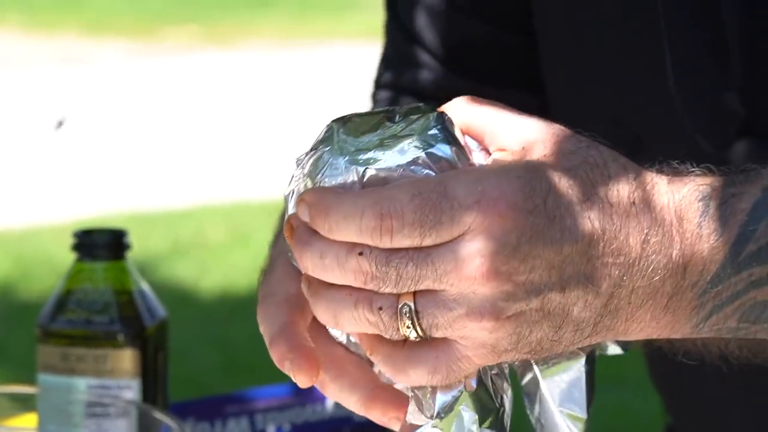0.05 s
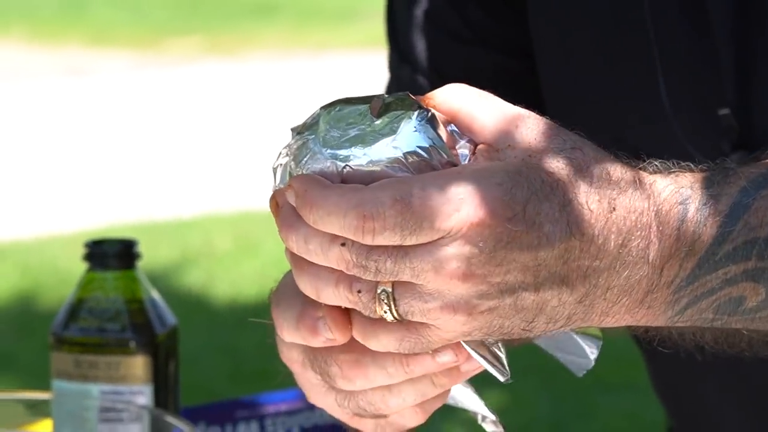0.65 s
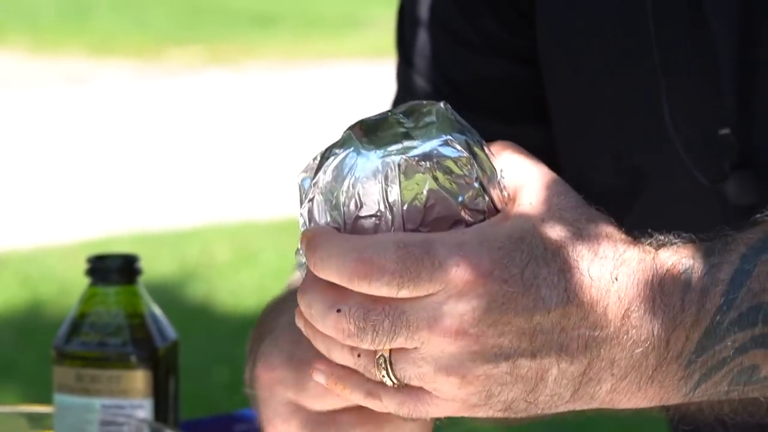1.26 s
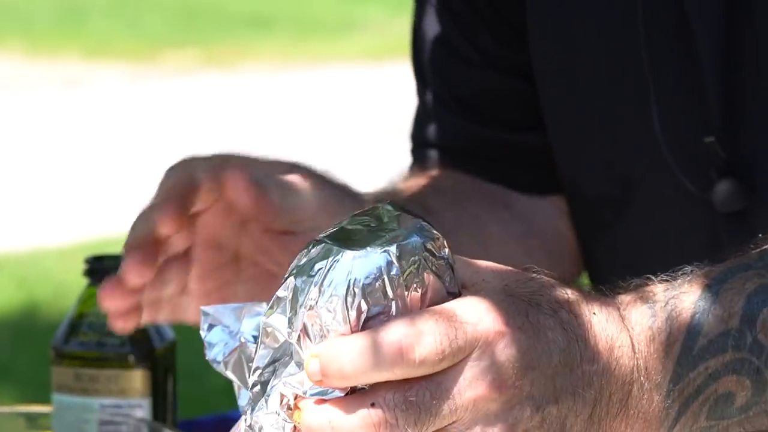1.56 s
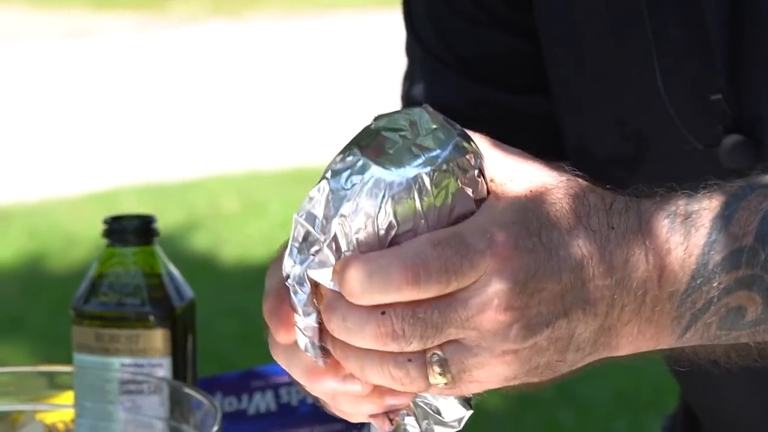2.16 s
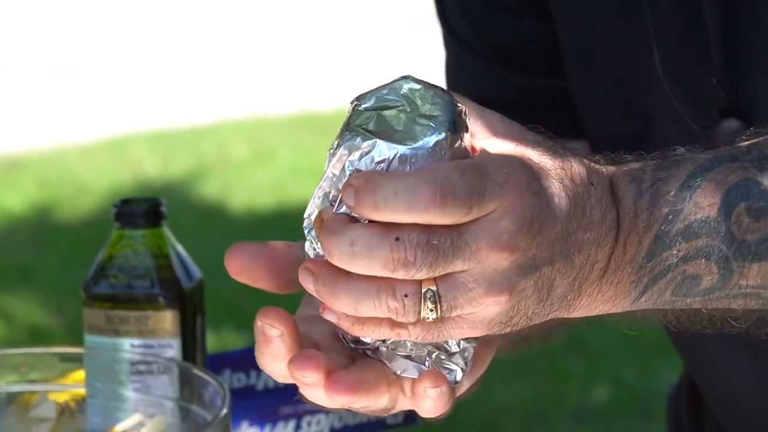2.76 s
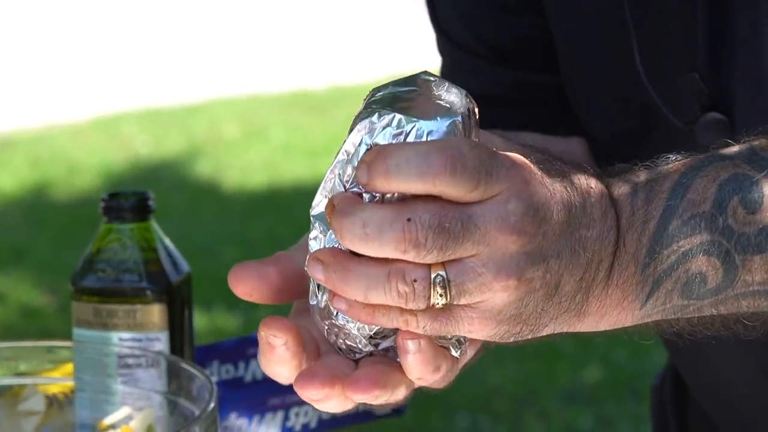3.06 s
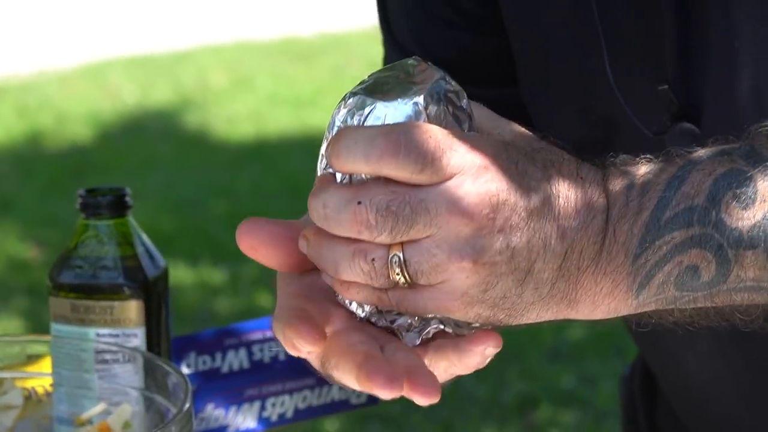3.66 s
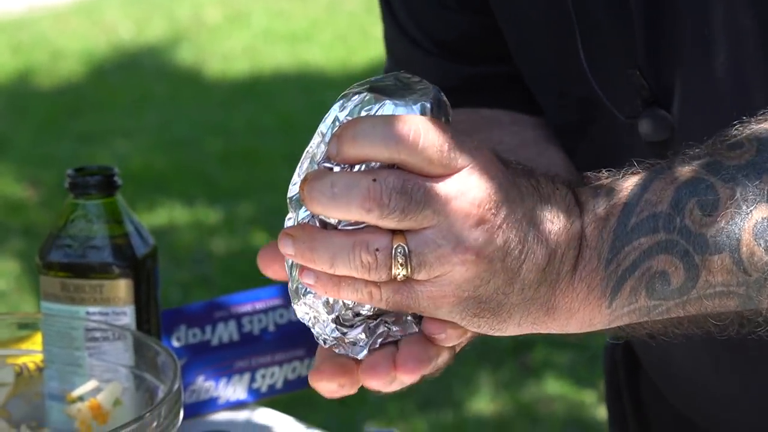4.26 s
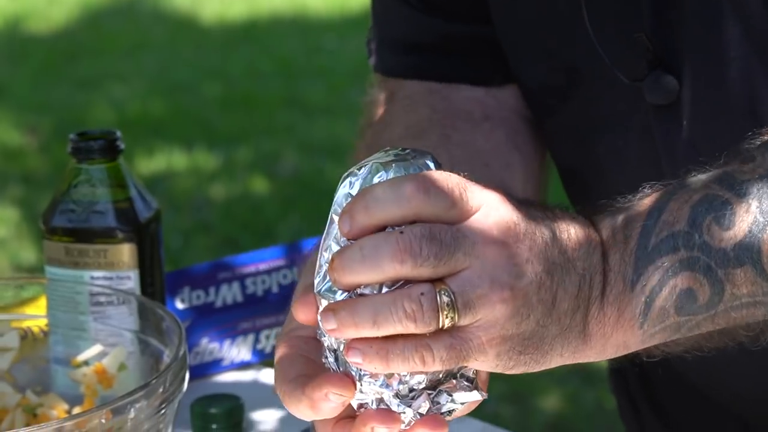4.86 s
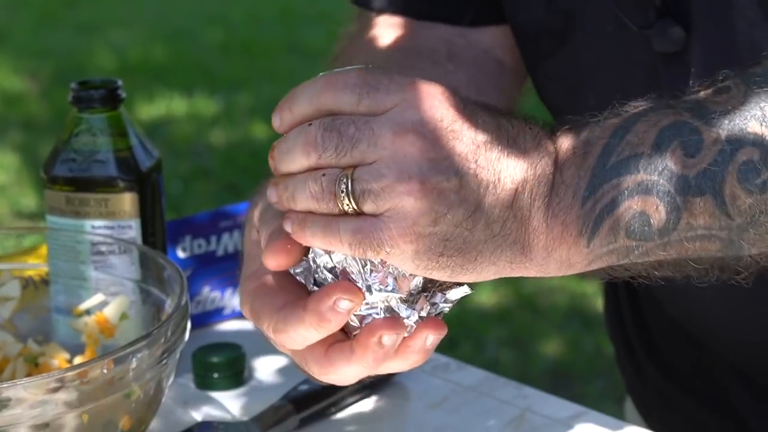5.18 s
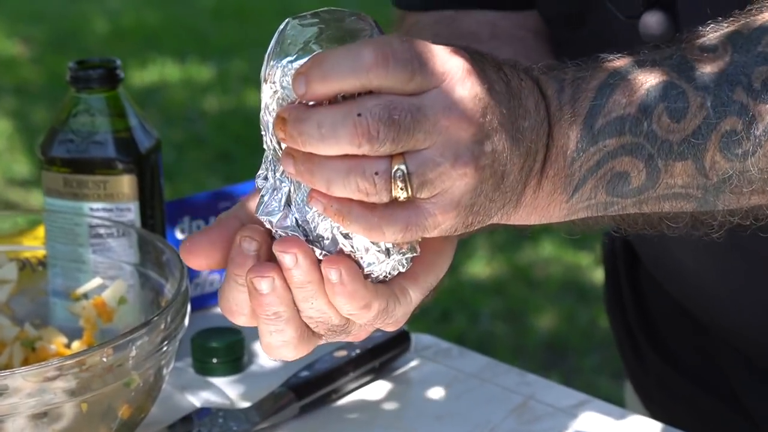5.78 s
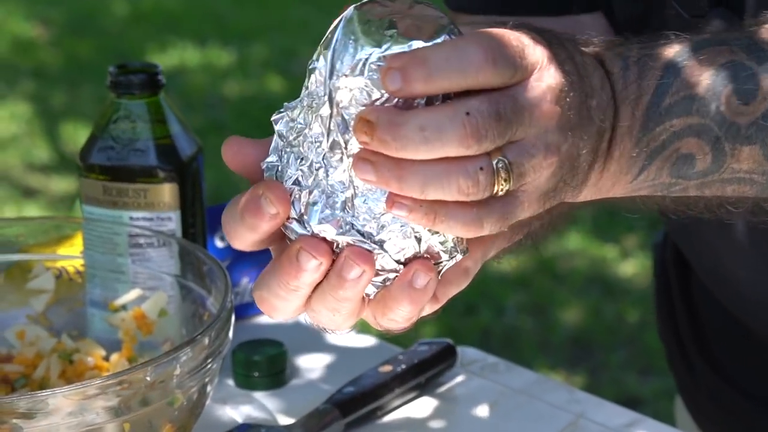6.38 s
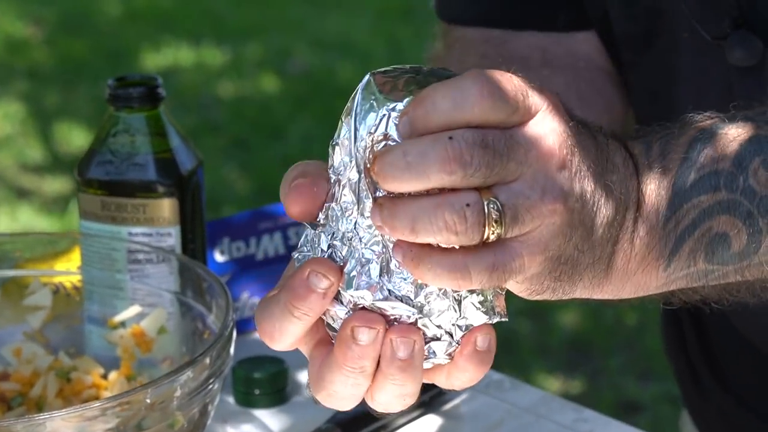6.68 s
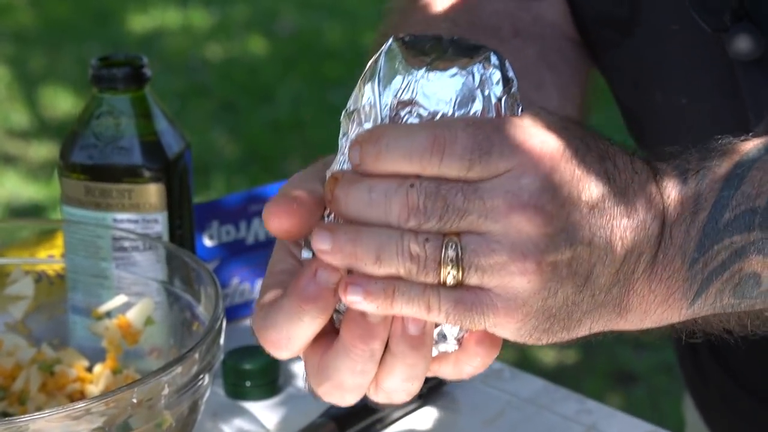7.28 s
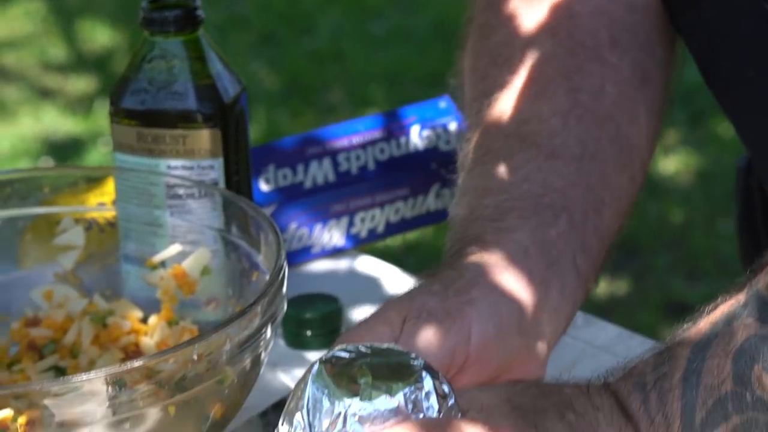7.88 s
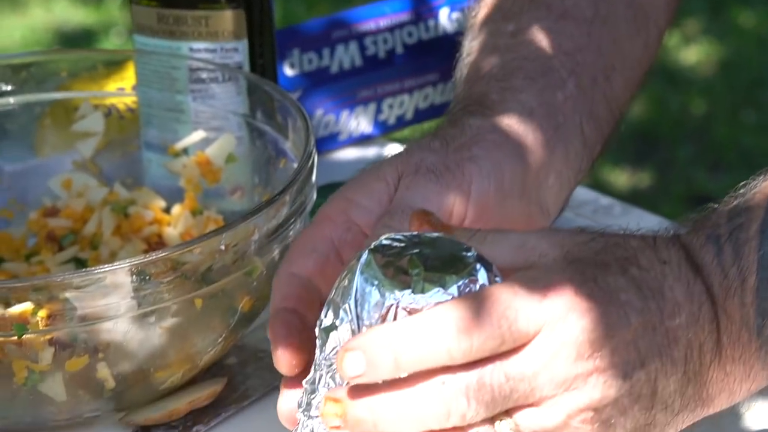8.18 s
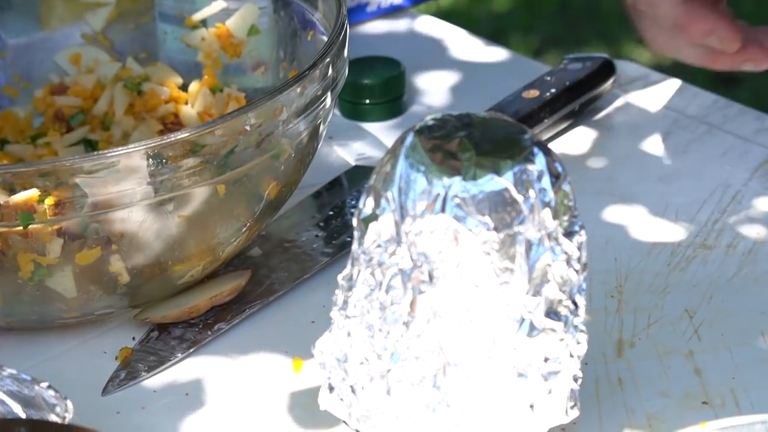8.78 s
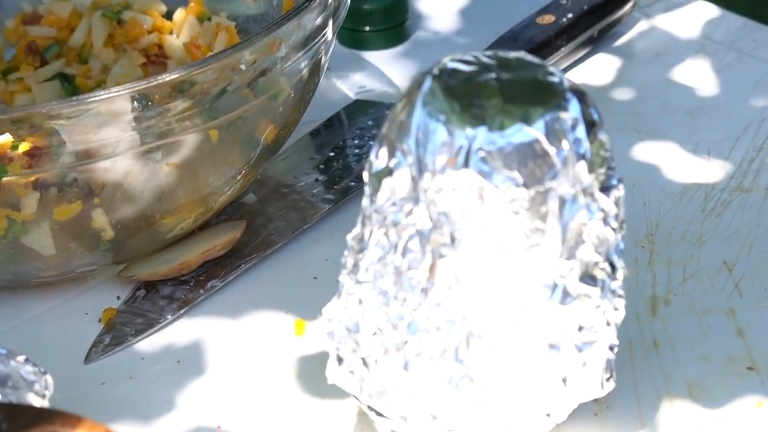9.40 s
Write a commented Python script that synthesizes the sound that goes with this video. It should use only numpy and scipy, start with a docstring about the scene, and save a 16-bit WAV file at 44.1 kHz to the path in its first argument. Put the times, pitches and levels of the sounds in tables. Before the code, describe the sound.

Two hands press aluminium foil around food close to the microphone. For about three seconds it crinkles densely, with sharp little snaps and a few dull pats. As the wrap tightens, it drops to softer, scattered rustles and ticks. Near the end the bundle is set on a table with a crunchy knock. A faint low garden rumble runs underneath, and one far bird chirps at the close.

```python
"""Aluminium foil crinkles close by as two hands press it around food, then set it on a table with a knock.
The loose sheet crumples in dense swarms of tiny buckles, larger facets snap and ring, palms pat the
bundle, and the tightened wrap only rustles. Behind it lies a garden: a low rumble, a light breeze
and, near the end, one far bird."""
import sys
import numpy as np
from scipy import signal
from scipy.fft import rfft, irfft, next_fast_len
from scipy.io import wavfile

SR = 44100
rng = np.random.default_rng(int(sys.argv[2]) if len(sys.argv) > 2 else 0)


def file_out(sig):
    """Save sig as 16-bit WAV at sys.argv[1]."""
    # one column per channel
    cols = np.atleast_2d(sig).T
    # limit, then scale
    lim = np.clip(cols, -1, 1)
    pcm = np.round(lim * 32767).astype(np.int16)
    wavfile.write(sys.argv[1], SR, pcm)


N = 420713
TIME = np.arange(N) / SR


def crinkle(body_gain, treble_gain, tighten_start_s=2.2, tighten_length_s=1, split_hz=4500):
    """Harder squeezes buckle more creases a second; the wrap loses its low body as it tightens."""
    # Hand contact. Each row: time in seconds, share of sliding 0-1, top-octave sheen in dB.
    touch = [(0, 0.32, -1.5), (.9, 0.08, -1.5), (1.4, 0.65, -3), (1.55, 0.67, 2), (2.0, 0.25, .5),
             (3.0, 0, -2.5), (3.6, 0.27, -0.5), (4.7, 0.07, -0.5), (5.45, 0.01, 2), (5.95, 0.38, -2),
             (6.35, 0.8, -2), (6.7, 0.04, -1), (7.05, 0.35, 1.5), (7.55, 0.65, 1), (8.1, 0, 2),
             (8.75, .02, 4)]
    # Spectra of loose sheet and tight wrap. Each row: frequency in Hz, gain in dB.
    loose_spectrum = [(170, -1.5), (500, -1), (800, -2.5), (1200, 1.5), (1750, 4), (2250, -2.5),
                      (2750, 2.5), (3800, -8), (5500, -3), (7500, -3), (10000, -7), (13000, -2.5),
                      (16000, -4.5)]
    tight_spectrum = [(200, -9), (600, 2), (1050, -3.5), (1500, 6), (1900, 6), (2300, -2), (2900, 1.5),
                      (3800, -8), (5200, -2.5), (7500, -6), (9500, -7), (13000, -2.5), (16000, -9)]
    slide, sheen_db = curves(touch)
    slide = np.clip(slide, 0, 1)
    rate_per_s = 350 + 800 * np.sqrt(np.hypot(body_gain, treble_gain) / undb(-45))
    swarm = buckles(rate_per_s, spread_db=4.5, t60_s=0.013)
    swarm += undb(-7.5) * facets(low_hz=1753, high_hz=15100, cycles=41, spread_db=2.5, count=3600)
    lone_creases = buckles(130, spread_db=2.5, t60_s=0.0033)
    swarm = unit(swarm + undb(-3) * lone_creases)
    # sliding skin trips so many creases that they merge
    slide_hiss = buckles(13000, spread_db=-1.5, t60_s=0.0093)
    swarm = np.sqrt(1 - slide) * swarm + np.sqrt(slide) * slide_hiss
    swarm *= undb(wander(54))  # the foil gives way in fits
    swarm = cupped_palms(swarm, echo=0.18, lag_s=0.0005015, sway=0.3)
    tightness = np.clip((TIME - tighten_start_s) / tighten_length_s, 0, 1)
    foil = (1 - tightness) * colour(swarm, loose_spectrum) + tightness * colour(swarm, tight_spectrum)
    foil += (undb(sheen_db) - 1) * colour(foil, [(4000, -43), (7500, -6), (11000, 3.5)])
    body = unit(band(foil, split_hz, "lowpass", order=4))
    treble = unit(band(foil, split_hz, "highpass", order=4))
    return body_gain * body + treble_gain * treble


def buckles(rate_per_s, spread_db, t60_s):
    """A swarm of tiny buckles of random size, each a sudden noise burst that dies at once."""
    hits = rng.random(N) < rate_per_s / SR
    size = undb(spread_db * np.minimum(rng.exponential(size=N), 4))
    power = signal.lfilter([1], [1, -fade(2 / SR, t60_s)], hits * size ** 2 / rate_per_s + 1e-18)
    return unit(np.sqrt(power) * rng.standard_normal(N))


def facets(low_hz, high_hz, cycles, spread_db, count):
    """Small facets flip and ring briefly, each at its own pitch."""
    out, t = np.zeros(N), TIME[:512]
    for when, pitch, size in rng.random((count, 3)):
        hz = low_hz * (high_hz / low_hz) ** pitch
        gain = undb(-spread_db * np.log(size + 0.013)) * np.sqrt(hz)
        add(out, when * TIME[-1], gain * ring(t, hz, cycles / hz))
    return unit(out)


def pressure(attack_db_per_s=1200, release_db_per_s=707):
    """Body and treble gains of the crinkle: each squeeze takes hold, swells or eases, and lets go."""
    # Light hold between squeezes. Each row: time in seconds, level in dB, treble minus body in dB.
    grip = [(0, -52, 2), (1.4, -48.5, -3), (1.65, -72, 2), (1.76, -72, -8), (2.3, -44.5, -3), (2.5, -58, 6),
            (3.2, -64.5, 11), (8.0, -67.5, 7), (8.35, -79, -8), (8.75, -72.5, 14), (9.5, -82, 8)]
    # Finger squeezes. Each row: start and length in seconds, midpoint level in dB,
    # swell from start to end in dB, treble minus body in dB.
    squeezes = [(0.017, 0.042, -43.5, 5, -2), (0.084, 0.041, -40.5, -19, 2), (0.114, 0.088, -37.5, -1, -2),
                (0.281, 0.062, -36, 11, -3.5), (0.423, 0.044, -35, 7.5, 3), (0.5, 0.026, -33.5, 10, -5.5),
                (0.586, 0.038, -38, 3, -8.5), (0.663, 0.027, -43, 8, -4), (0.723, 0.076, -37.5, 7, -1.5),
                (0.816, 0.028, -38, 15.5, -1.5), (0.895, 0.027, -33, 6.5, 3), (0.994, 0.0093, -42, 13, 2),
                (1.059, 0.124, -41.5, -9.5, -2), (1.235, 0.032, -49, -11, 6),
                (1.297, 0.078, -41, -2.5, 3.5), (1.387, 0.029, -44, 18, 8), (1.461, 0.023, -31.5, 3, -2.5),
                (1.517, 0.038, -27.5, 5.5, 1), (1.766, 0.043, -34, -0.5, -2.5),
                (1.855, 0.071, -34.5, -1.5, -2.5), (1.947, 0.043, -35.5, -5, -3.5),
                (2.01, 0.1, -43, 5, -1.5), (2.143, 0.027, -42.5, 12, 2), (2.24, 0.15, -43.5, 5.5, 3),
                (2.508, 0.096, -39.5, 14.5, 0), (2.678, 0.14, -40.5, 13.5, 3.5),
                (2.882, 0.042, -40, 2.5, 6), (2.954, 0.073, -43.5, 17, 1.5), (3.082, 0.035, -53, -2, 1),
                (3.289, 0.058, -53, -10.5, 1.5), (3.39, 0.143, -58.5, 4, 4),
                (3.572, 0.059, -55.5, 19.5, -3), (3.719, 0.049, -63.5, 0, 10), (3.837, 0.068, -53.0, 7, 3),
                (4.051, 0.022, -52.5, 14, 1), (4.114, 0.051, -48.0, 12, 3), (4.24, 0.042, -59.5, -12, -1),
                (4.394, 0.12, -54, 13, 1), (4.538, 0.058, -45, -10, 0), (4.665, 0.049, -45.5, 4.5, 0.5),
                (4.748, 0.079, -57, -2, -1), (4.904, 0.075, -51, 3.5, 4.5), (5.114, 0.17, -56.5, -6, 3),
                (5.393, 0.062, -44, 17, 3), (5.627, 0.013, -49, -20, -2), (5.672, 0.046, -57.5, 8, 3),
                (5.82, 0.034, -48.5, 3.5, 7), (5.994, 0.08, -52, 4.5, 6), (6.137, 0.05, -57, 4, 6),
                (6.368, 0.13, -56, 6, 9), (6.541, 0.18, -56.5, -2.5, 3), (6.85, 0.055, -57, 3, 4),
                (6.94, 0.011, -53, 11, 17), (6.978, 0.017, -51, -2, -1), (7.022, 0.15, -59.5, 0, 8),
                (7.409, 0.021, -51.5, -3, -1), (7.468, 0.033, -50.5, 3.5, 5), (7.52, 0.14, -57.5, 2, 2),
                (7.62, 0.017, -57, 4, -15), (7.941, 0.077, -57.5, -4, 6)]
    layers = [curves(grip)]
    for start_s, length_s, db, swell_db, treble_db in squeezes:
        t = TIME - start_s
        edges_db = attack_db_per_s * np.maximum(-t, 0) + release_db_per_s * np.maximum(t - length_s, 0)
        ramp_db = swell_db * (np.clip(t / length_s, 0, 1) - .5)
        layers.append((db + ramp_db - edges_db, treble_db))
    total_power, treble_power = np.zeros(N), np.zeros(N)
    for db, treble_db in layers:
        active = db > -100
        power = undb(db[active]) ** 2
        total_power[active] += power
        treble_power[active] += power / (1 + undb(-treble_db) ** 2)
    return np.sqrt(total_power - treble_power), np.sqrt(treble_power)


def snaps():
    """A big facet pops through: a short ring, a hard-edged crack and a shiver of the sheet around it."""
    # Each row: start in seconds, ring pitch in Hz, relative ring and crack levels in dB,
    # crack centre in Hz.
    pops = [(0.0792, 2940, -31.5, -26.5, 5300), (0.0898, 3100, -33, -43, 4850),
            (0.1268, 3130, -32, -28, 6600), (0.155, 2060, -36, -28.5, 3100), (0.171, 1680, -33, -48, 2800),
            (0.199, 6470, -28, -29, 6300), (0.2838, 1370, -43, -30.5, 5700), (0.3314, 1850, -36, -32, 4300),
            (0.366, 6300, -45, -32, 5600), (0.459, 3060, -38, -32, 6200), (0.5165, 1590, -28.5, -37, 3700),
            (0.5659, 6070, -55, -42, 7300), (0.5987, 2480, -42, -35, 7900),
            (0.7271, 1420, -30, -26.5, 4260), (0.7337, 5430, -32, -36, 4100),
            (0.773, 2580, -25.5, -35, 2800), (0.8456, 2660, -35, -42, 4600), (0.8532, 2000, -38, -38, 3500),
            (0.915, 1960, -34, -26, 5900), (1.0086, 3700, -43, -37, 5600), (1.0435, 2520, -37, -42, 4900),
            (1.0605, 1180, -27, -31, 2300), (1.0908, 2520, -31, -53, 3100), (1.103, 1920, -37, -39, 3900),
            (1.1348, 2530, -39, -38, 4100), (1.1565, 7840, -59, -37.5, 7100),
            (1.2133, 4120, -46, -43, 6500), (1.2345, 3900, -35, -37.5, 5700),
            (1.324, 2960, -35.5, -36, 6000), (1.459, 1640, -36, -28.5, 5070),
            (1.4776, 1150, -31, -28, 3700), (1.5578, 4070, -36, -26, 7600),
            (1.7547, 1730, -41, -36.5, 5000), (1.9206, 8970, -27.5, -29.5, 6800),
            (2.0277, 2670, -27, -43, 2400), (2.0822, 1660, -37, -39, 4300), (2.16, 1810, -35, -35, 5260),
            (2.1685, 7700, -37, -30, 6670), (2.2388, 2690, -42, -37.5, 5400), (2.276, 1810, -36, -41, 4000),
            (2.3164, 1840, -40, -35.5, 6400), (2.373, 6140, -50, -40, 9300), (2.411, 4730, -39, -37, 4200),
            (2.5069, 7900, -37, -38, 7100), (2.545, 6680, -42, -38, 6200), (2.6149, 2920, -32.5, -33, 6070),
            (2.6862, 3040, -55, -51, 4400), (2.7308, 4900, -30.5, -31.5, 7100),
            (2.7822, 7370, -30.5, -30.5, 6700), (2.798, 1290, -31.5, -31, 5000),
            (2.9165, 6700, -48, -31, 6600), (2.9674, 1820, -29.5, -33, 3400),
            (3.0255, 8900, -32.5, -29.5, 2900), (3.097, 5160, -48, -45, 5000), (3.15, 2500, -55, -47, 3900),
            (3.2362, 3080, -52, -46, 5100), (3.2906, 3340, -49, -46, 5300), (3.342, 1940, -50.5, -48, 3850),
            (3.5224, 8140, -47, -31, 6450), (3.526, 7700, -42, -47, 8900), (3.6226, 4530, -48, -38, 7200),
            (3.91, 1850, -45, -42, 4580), (4.065, 3380, -49, -58, 3700), (4.292, 7360, -62, -42.5, 10300),
            (4.301, 1530, -54.5, -46, 4800), (4.388, 4830, -49, -44, 3900), (4.409, 1380, -45, -49, 5500),
            (4.4215, 7200, -43, -32.5, 5400), (4.467, 1510, -33, -32.5, 3140),
            (4.493, 1380, -48, -46, 5400), (4.698, 5200, -41, -42, 4600), (4.801, 3640, -52, -49.5, 4200),
            (5.117, 2720, -53, -48, 5100), (5.1881, 1506, -28.5, -37, 1800),
            (5.2311, 1900, -50, -41.5, 10500), (5.4929, 1970, -44.5, -36.5, 8900),
            (5.6198, 4180, -48, -34, 7700), (5.8396, 5400, -45, -42, 7000), (5.8472, 4180, -39, -50, 4300),
            (6.2108, 4290, -47.5, -49, 3880), (6.24, 7360, -49, -52, 5700), (6.293, 2410, -51, -58, 3000),
            (6.433, 3380, -52, -48.5, 4100), (6.6577, 8510, -53, -43, 6800), (6.6785, 5210, -50, -52, 3900),
            (6.711, 4500, -58, -52, 5800), (6.9534, 5230, -53, -42, 9500), (7.1164, 6900, -60, -35.5, 5970),
            (7.1702, 6600, -45, -40.5, 7900), (7.1877, 5960, -59, -49, 7100), (7.231, 5530, -56, -62, 4400),
            (7.4234, 1680, -48.5, -55, 3600), (7.5, 2000, -53, -52, 4000), (7.569, 1890, -49.5, -56, 3000),
            (7.6267, 2030, -46, -68, 2800), (7.6367, 2260, -42.5, -64, 2700),
            (8.725, 9000, -70, -62, 11000)]
    rings, cracks, t = np.zeros(N), np.zeros(N), TIME[:2048]
    bins_hz = np.fft.rfftfreq(len(t), 1 / SR) + 1
    edge = undb(2) * fade(t, 0.0014)
    shiver = undb(-21) * fade(t, 0.057)
    attack = 1 - np.exp(-t / 0.00015)
    burst = attack * (edge + fade(t, 0.012) + shiver)
    for start_s, hz, ring_db, crack_db, centre_hz in pops:
        t60_s = 0.012 * np.sqrt(2000 / hz)  # smaller, higher facets die sooner
        # an uneven facet has weaker modes either side of its main one
        lower = ring(t, hz * rng.uniform(0.73, 0.97), t60_s)
        upper = ring(t, hz * rng.uniform(1.176, 1.45), t60_s)
        add(rings, start_s, undb(ring_db + 10) * (ring(t, hz, t60_s) + 0.34 * (lower - upper)))
        spectrum = np.exp(-(np.log(bins_hz / centre_hz) / 1.41) ** 2)
        grit = unit(irfft(rfft(rng.standard_normal(len(t))) * spectrum))
        add(cracks, start_s, undb(crack_db + 6.5) * burst * grit)
    return rings + cupped_palms(cracks, echo=0.61, lag_s=0.000584, sway=0.2506)


def cupped_palms(x, echo, lag_s, sway):
    """Each palm throws the sound back a moment later; as the hands shift, so does the colour."""
    out = x
    for palm_lag_s in (lag_s, 1.692 * lag_s):
        delay_s = palm_lag_s * np.exp(sway * wander(2.44))
        out = out - echo * np.interp(TIME - delay_s, TIME, x)
    return out / np.sqrt(1 + 2 * echo ** 2)


def pats():
    """Palm and fingers knock dully on the soft bundle."""
    # Each row: start in seconds, relative level in dB, contact time in seconds.
    hits = [(.080, -30, 0.0011), (.155, -35, .0008), (0.199, -34, .004), (.323, -30, 0.0021),
            (0.334, -27, 0.0012), (.346, -34, 0.00072), (0.439, -37, 0.00069), (0.53, -36, 0.00086),
            (.727, -33.5, 0.002), (.916, -33, 0.0006), (1.0606, -39, 0.00031), (1.468, -39, 0.0009),
            (1.556, -51, .001), (1.859, -37, 0.0035), (1.923, -39, 0.0043), (2.167, -32, 0.0058),
            (3.025, -26.5, 0.0006), (3.524, -40, 0.003), (3.621, -42, 0.0044), (4.421, -34.5, 0.00095),
            (4.467, -36.5, 0.00077), (5.188, -44, 0.00027), (5.492, -36.5, 0.0065), (5.620, -33.5, 0.0036),
            (6.977, -46.5, 0.00039)]
    # Each row: frequency in Hz, gain in dB, t60 in seconds.
    bundle_modes = [(37, -5.5, 0.16), (89, -11, 0.034), (166, -1.5, 0.023), (330, 2, 0.0093),
                    (590, -10, 0.012), (760, 11.5, 0.0035)]
    out = np.zeros(N)
    for start_s, db, contact_s in hits:
        add(out, start_s, undb(db) * knock(bundle_modes, contact_s))
    return out


def landing():
    """The bundle lands and rocks: the foil crunches, the table and the things on it shudder."""
    # Each row: start in seconds, relative knock level in dB, contact time in seconds,
    # relative crunch level in dB.
    impacts = [(7.7717, -25, 0.00056, -22.5), (7.7902, -39, 0.0023, -31.5), (7.807, -32, 0.0015, -44),
               (7.84, -52, .0015, -50)]
    # Each row: frequency in Hz, gain in dB, t60 in seconds.
    tabletop_modes = [(56.5, -19, 0.23), (112, -18, 0.2), (146, -11.5, 0.14), (181.5, 6, 0.054),
                      (453, -29, 0.13), (650, 1.5, 0.023), (910, -20, 0.027), (1114, -10, 0.05),
                      (1740, 3.5, 0.03)]
    knocks, shudder, crunch, t = np.zeros(N), np.zeros(N), np.zeros(N), TIME[:SR // 2]
    for start_s, db, contact_s, crunch_db in impacts:
        add(knocks, start_s, undb(db) * knock(tabletop_modes, contact_s))
        add(crunch, start_s, undb(crunch_db) * fade(t, 0.043) * rng.standard_normal(len(t)))
        add(shudder, start_s, undb(db) * fade(t, 0.51) * rng.standard_normal(len(t)))
    crunch = colour(crunch, [(300, -15), (900, 7), (1400, -10), (2200, 1.5), (3200, -7), (4900, 3),
                             (7000, 0.5), (10000, -10), (16000, -3)])
    shudder = colour(shudder, [(60, 6), (280, 1.5), (500, -0.5), (750, -7.5), (1200, -18),
                               (2500, -23), (8000, -56)])
    return knocks + shudder + crunch


def knock(modes, contact_s):
    """A struck body rings; a longer contact gives a duller knock."""
    push = np.hanning(int(contact_s * SR) + 3)
    response = sum(undb(db) * ring(TIME[:SR // 2], hz, t60_s) for hz, db, t60_s in modes)
    return signal.fftconvolve(response, push / push.sum())


def fanned_air(effort):
    """The moving sheet fans a little air at the microphone."""
    spectrum = [(10, -2), (30, 13), (70, -9), (200, -10.5), (500, -20), (2000, -70)]
    return undb(-15) * effort * unit(colour(rng.standard_normal(N), spectrum))


def garden():
    """Wavering low rumble, a thin high hiss and leaves in a breeze."""
    # Each row: frequency in Hz, gain in dB.
    rumble_spectrum = [(25, -7.5), (45, -0.5), (65, 0.5), (95, 3.5), (150, -4), (195, -6), (245, -3.5),
                       (350, -13.5), (680, -14), (950, -20.5), (1200, -21.5), (2000, -28), (4000, -34.5),
                       (16000, -45)]
    # Each row: time in seconds, level of the leaves in dB.
    breeze = [(0, -68.5), (8.4, -80), (8.8, -69), (9.15, -65.5), (9.54, -67.5)]
    rumble_db = -51.5 + 0.88 * wander(5.3)
    rumble = undb(rumble_db) * unit(colour(rng.standard_normal(N), rumble_spectrum))
    hiss = undb(-78.5) * unit(band(rng.standard_normal(N), [9800, 10600], "bandpass", order=3))
    leaves = undb(curves(breeze)[0]) * unit(band(rng.standard_normal(N), [1000, 3900], "bandpass"))
    return rumble + hiss + leaves


def bird(start_s=9.05, note_hz=4560, note_s=.055, trill_hz=3430, fall_hz_per_s=3200, pulse_hz=34.3):
    """A far bird: a high note and a falling trill; random flutter gives the blur of echoes."""
    attack_s, fade_start_s, t60_s = .035, .125, .55
    t = np.maximum(TIME - start_s, 0)
    note = undb(-63) * np.sin(np.pi * np.minimum(t / note_s, 1)) * np.sin(2 * np.pi * note_hz * t)
    envelope = np.minimum(t / attack_s, 1) * fade(np.maximum(t - fade_start_s, 0), t60_s)
    pulses = 1 + .6 * np.sin(2 * np.pi * pulse_hz * t)
    phase = 2 * np.pi * np.cumsum(trill_hz - fall_hz_per_s * t) / SR
    trill = undb(-61.5) * envelope * pulses * np.sin(phase)
    return (note + trill) * wander(110)


def undb(db):
    """Decibels to gain."""
    return 10 ** (np.asarray(db) / 20)


def unit(x):
    """Scale to rms 1."""
    return x / np.sqrt(np.mean(x ** 2))


def curves(table):
    """Interpolate each column over the times in the first."""
    times_s, *columns = np.transpose(table)
    return [np.interp(TIME, times_s, column) for column in columns]


def band(x, hz, kind, order=2):
    """Butterworth filter."""
    return signal.sosfilt(signal.butter(order, hz, kind, fs=SR, output="sos"), x)


def colour(x, points):
    """Shape a spectrum by (Hz, dB) points."""
    hz, db = np.transpose(points)
    size = next_fast_len(N)
    bins_hz = np.maximum(np.fft.rfftfreq(size, 1 / SR), 1)
    gain = undb(np.interp(np.log(bins_hz), np.log(hz), db))
    return irfft(rfft(x, size) * gain, size)[:N]


def fade(t, t60_s):
    """Exponential decay, 60 dB in t60_s."""
    return np.exp(-np.log(1000) * t / t60_s)


def ring(t, hz, t60_s):
    """One damped mode."""
    return np.sin(2 * np.pi * hz * t) * fade(t, t60_s)


def wander(rate_hz):
    """Random drift, rms 1."""
    return unit(band(rng.standard_normal(N), rate_hz, "lowpass"))


def add(out, start_s, sound):
    """Mix a sound in at start_s."""
    i = int(start_s * SR)
    out[i:i + len(sound)] += sound[:len(out[i:i + len(sound)])]


def scene():
    """Foil and hands in the open air, mono."""
    body_gain, treble_gain = pressure()
    foil = crinkle(body_gain, treble_gain) + snaps()
    handling = pats() + landing() + fanned_air(np.hypot(body_gain, treble_gain))
    return (foil + handling + garden() + bird())[None]


def record(dry):
    """A steep low-pass cuts the top."""
    cutoff_hz = 15900
    return signal.sosfilt(signal.ellip(10, .2, 70, cutoff_hz, fs=SR, output="sos"), dry)


dry = scene()
out = record(dry)
file_out(out)
```